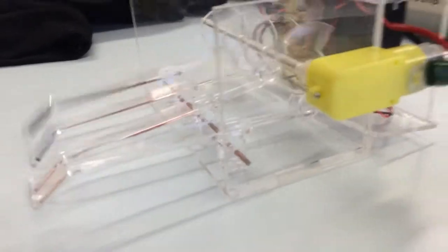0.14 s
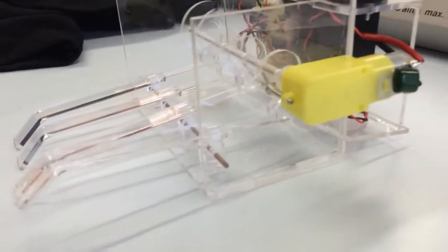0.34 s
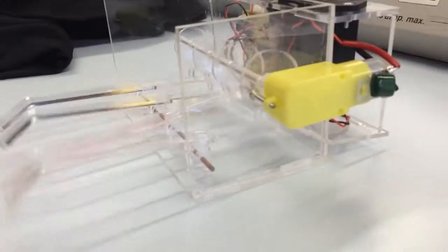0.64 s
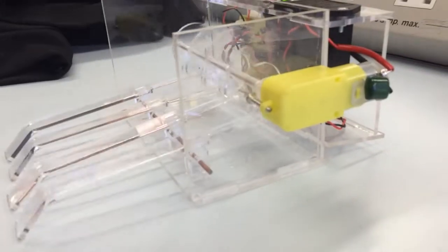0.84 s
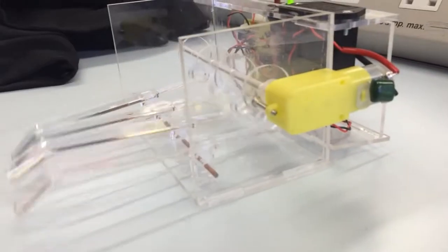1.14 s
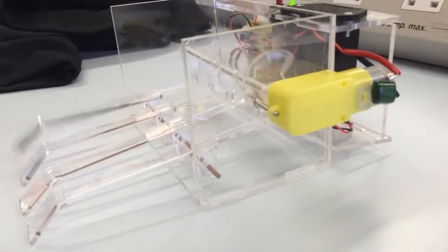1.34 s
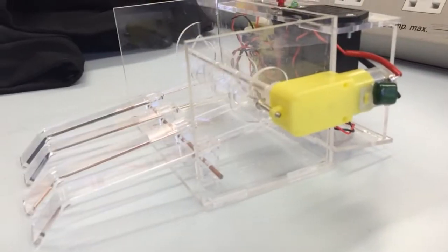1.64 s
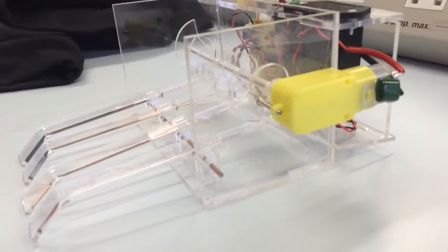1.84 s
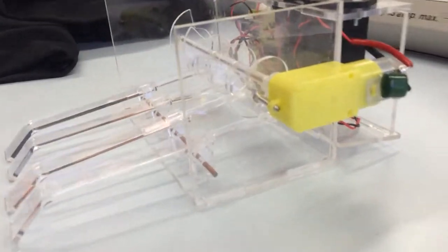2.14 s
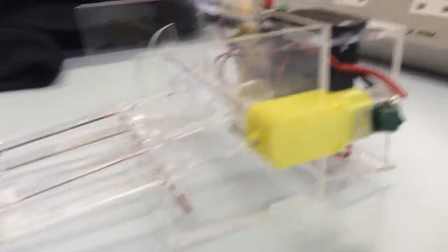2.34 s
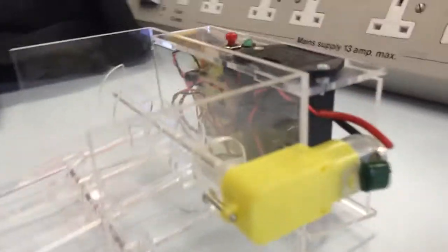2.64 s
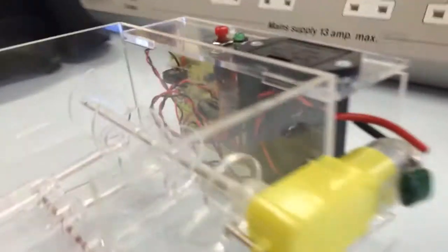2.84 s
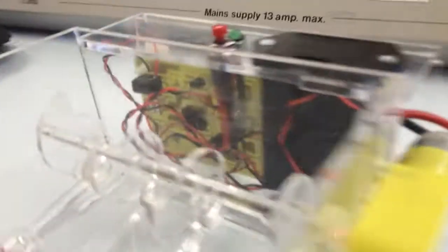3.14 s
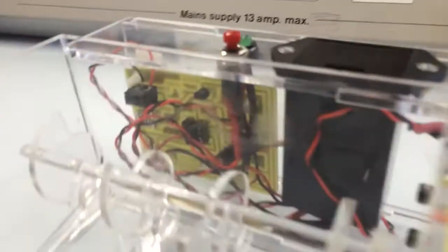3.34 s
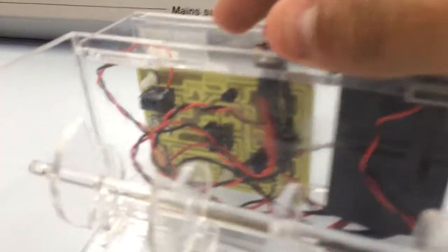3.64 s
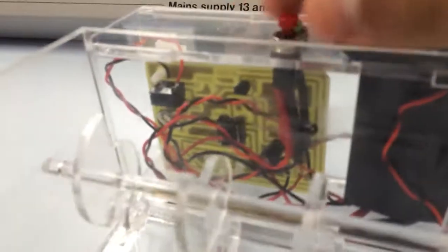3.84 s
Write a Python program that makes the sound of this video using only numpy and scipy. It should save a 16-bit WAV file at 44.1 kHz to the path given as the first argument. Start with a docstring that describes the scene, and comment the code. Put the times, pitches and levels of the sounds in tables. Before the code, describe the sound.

Buzzy little gearmotor with sharp plastic clacking winds down, followed by quiet, knocks and faint touches.

```python
"""On a table in a quiet room, one microphone hears a small geared motor turn a camshaft in a plastic frame:
random tooth clicks, shaft-locked tones and brush hiss, its speed swinging with the cam load. Levers drop off
the cams in three bursts of clacks that ring their modes, over low handling bumps. The motor coasts to rest;
then small ticks, brushes and rattles sound nearby as short bursts of banded noise. Nearby something is knocked
twice: swelling noise that rings furniture modes. Last come faint touches."""
import sys
import numpy as np
from scipy import signal
from scipy.fft import rfft, irfft
from scipy.io import wavfile

SR = 44100
rng = np.random.default_rng(int(sys.argv[2]) if len(sys.argv) > 2 else 0)


def put_to_file(sound):
    """Save the sound as 16-bit audio at rate SR, in the file named by the first command-line argument."""
    columns = np.atleast_2d(sound).T  # one column per channel
    safe = np.clip(columns, -1, 1)
    whole_steps = np.round(safe * 32767)
    wavfile.write(sys.argv[1], SR, whole_steps.astype(np.int16))


def voltage_ratio(decibels):
    """Convert decibels (scalar or array-like) to amplitude ratios, 20 dB per decade."""
    exponent = np.asarray(decibels, float) / 20
    return 10 ** exponent


N = 176400


def rms_one(x):
    """Scale to rms 1."""
    return x / np.sqrt(np.mean(x ** 2) + 1e-20)


def at_hz(points, hz):
    """Read a spectrum table in dB on a log frequency axis."""
    f, db = np.transpose(points)
    return np.interp(np.log(np.maximum(hz, 1)), np.log(f), db)


def colour(x, spectrum, peaks=(), tilt_db=0.):
    """Shape noise by a spectrum, tilted in dB per octave and raised at resonances; rms 1."""
    hz = np.arange(len(x) // 2 + 1) * SR / len(x) + 1
    lift = 1 + sum(voltage_ratio(db) / (1 + (2 * (hz - f) / width) ** 2) for f, width, db in peaks)
    gain = voltage_ratio(at_hz(spectrum, hz) + tilt_db * np.log2(hz / 4000)) * lift
    return rms_one(irfft(rfft(x) * gain, len(x)))


def drift(rate_hz, count):
    """Slow random wander of spread 1: noise through two equal poles, run at SR / 40."""
    r = np.exp(-80 * np.pi * rate_hz / SR)
    noise = rng.standard_normal(count // 40 + 1002)
    slow = signal.lfilter([1], [1, -2 * r, r * r], noise)[1000:]   # settled part
    return np.interp(np.arange(count) / 40, np.arange(len(slow)), rms_one(slow))


def ring(x, hz, t60):
    """A two-pole resonance: a unit click starts a sine of height 1 that falls 60 dB in t60 seconds."""
    r, w = voltage_ratio(-60 / (t60 * SR)), 2 * np.pi * hz / SR
    return signal.lfilter([0, np.sin(w)], [1, -2 * r * np.cos(w), r * r], x + 1e-18)


def bandpass(x, low_hz, high_hz):
    """Keep one band, its top held below 0.45 SR."""
    edges = [low_hz, min(high_hz, .45 * SR)]
    return signal.sosfilt(signal.butter(2, edges, "band", fs=SR, output="sos"), x)


def steep_lowpass(x, order, edge_hz):
    """Cut everything above the edge by 60 dB."""
    return signal.sosfilt(signal.cheby2(order, 60, edge_hz, fs=SR, output="sos"), x)


def add(out, s, x):
    """Mix x in at time s."""
    i = int(s * SR)
    out[i:i + len(x)] += x[:len(out) - i]


def bursts(rows):
    """Grainy noise in a band around a geometric centre: quick rise, slower fall."""
    out, t = np.zeros(N), np.arange(SR // 3) / SR
    for s, db, length, hz, width_hz in rows:
        grain = rng.standard_normal(len(t)) * voltage_ratio(1.6 * rng.exponential(1, len(t)))
        low_hz = np.sqrt(hz ** 2 + width_hz ** 2 / 4) - width_hz / 2
        band = rms_one(bandpass(grain, low_hz, low_hz + width_hz))
        rise = np.minimum(t / (0.097 * length), 1)
        fall = voltage_ratio(-30 * np.maximum(t / length - .6, 0))
        add(out, s, voltage_ratio(db) * band * rise * fall)
    return out


# the quiet room's spectrum: (f/Hz, relative level/dB)
ROOM_SPECTRUM = [(15, -58.5), (25, -24), (53, -7), (75, -16.5), (122, -0.5), (194, -6), (227, -3.5),
                 (290, -13), (332, -10.5), (360, -13.5), (633, -19), (1860, -28.5), (2180, -30),
                 (4520, -37), (15600, -45)]
# fan resonances in it: (f/Hz, width/Hz, lift/dB)
FAN = [(126.7, 13, -4.5), (223.4, 44, 1.5), (332.4, 3.1, 4.5)]


def room():
    """Background noise coloured by the room and raised at fan resonances, its level wandering."""
    level_db = -50 + .7 * drift(6, N)
    return voltage_ratio(level_db) * colour(rng.standard_normal(N), ROOM_SPECTRUM, FAN)


# bumps from handling, mostly low: (t/s, relative level/dB, length/s, centre f/Hz, width/Hz)
BUMPS = [(.185, -32.5, .11, 90.8, 170), (.2, -36.5, 0.15, 48, 23), (.3, -43.5, 0.088, 584, 55),
         (.43, -37.5, 0.084, 312, 39.4), (.86, -40.5, 0.05, 120, 90), (1.42, -46, 0.11, 410, 90),
         (1.56, -46, 0.077, 200, 70), (1.575, -38, 0.021, 1900, 300)]


def bumps():
    """Handling thuds as bursts of banded noise."""
    return bursts(BUMPS)


# small ticks, brushes and rattles nearby: (t/s, relative level/dB, length/s, centre f/Hz, width/Hz)
TOUCHES = [(2.087, -65, 0.017, 1685, 591), (2.1, -54, 0.026, 516, 148), (2.134, -55.5, 0.0038, 6000, 6050),
           (2.136, -59, 0.028, 6040, 499), (2.266, -71, .015, 6150, 600), (2.592, -56, 0.018, 696, 880),
           (2.86, -62.5, 0.082, 4900, 8900), (3.255, -49, 0.084, 756, 120),
           (3.312, -51, 0.0039, 7000, 12100), (3.312, -41.5, 0.052, 1410, 1800),
           (3.376, -37, 0.0036, 5930, 9000), (3.384, -32, 0.0054, 10000, 9100),
           (3.083, -24.5, 0.022, 3320, 700), (3.088, -18, 0.0097, 1614, 350),
           (3.129, -38, 0.016, 3320, 250), (3.1, -31, 0.032, 3540, 300), (3.347, -21.5, 0.0088, 770, 258),
           (3.351, -21.5, 0.0088, 1640, 297), (3.356, -31, 0.015, 3100, 1200),
           (3.573, -66, 0.0038, 7900, 6030), (3.71, -67, 0.047, 10840, 7940),
           (3.728, -59, 0.0065, 6150, 8920), (3.76, -64, 0.006, 12200, 5930),
           (3.885, -72, 0.1, 10000, 9000), (3.925, -54, 0.01, 4000, 8680)]


def touches():
    """Small ticks, brushes and rattles nearby as bursts of banded noise."""
    return bursts(TOUCHES)


# nearby knocks: (t/s, relative level/dB, rise/s, dull above f/Hz, t60/s, extra level/dB of the modes under 400 Hz)
KNOCKS = [(3.045, -18.5, 0.0093, 1870, 0.45, -0.5), (3.061, -36.5, 0.0013, 602, 0.2, -5),
          (3.082, -19.5, 0.0081, 8400, .25, -11), (3.087, -22.5, 0.0045, 4500, 0.14, -0.5),
          (3.345, -17.5, 0.02, 2700, 0.28, -9), (3.356, -22, 0.023, 10000, 0.25, -17),
          (3.482, -48, 0.0099, 5000, 0.19, -1)]
# spectrum of the knock noise: (f/Hz, relative level/dB)
KNOCK_SPECTRUM = [(41, -43), (70, -8), (132, -7), (202, -2), (373, -13), (751, -12), (941, -20.5),
                  (1580, -12.5), (2220, -14), (7690, -14), (15500, -20.5)]
# modes of the knocked furniture: (f/Hz, relative level/dB, t60/s)
PANEL = [(153, -11, .2), (190.5, 1, 0.52), (200, -5, 0.47), (274.2, -3.5, 0.38), (293.7, -3, 0.33),
         (750, -6, 0.043), (814, -11, 0.16), (1200, -6, 0.042), (1570, -4, .06), (1580, -11.5, .05),
         (2380, -5.5, 0.082), (3394, -8, 0.1), (3520, -25, 0.039), (6100, -24, .08)]


def knocks():
    """Each knock swells, dies in the room, treble first, and rings the panel modes."""
    out, t = np.zeros(N), np.arange(SR // 2) / SR
    tail_db, room_t60_s = -34, 0.91
    for s, db, rise, dull_hz, t60, boom_db in KNOCKS:
        grain = voltage_ratio(2.2 * drift(200, len(t)) + 2 * rng.exponential(1, len(t)))
        noise = colour(rng.standard_normal(len(t)), KNOCK_SPECTRUM) * grain
        low = signal.sosfilt(signal.butter(2, 2500, fs=SR, output="sos"), noise)
        high = noise - low
        swell = np.minimum(t / rise, 1) ** 0.55
        tail = noise[::-1] * voltage_ratio(tail_db - 60 * t / room_t60_s)   # reversed to differ from the direct sound
        body = swell * (low * voltage_ratio(-60 * t / t60) + high * voltage_ratio(-85 * t / t60) + tail)
        push = rms_one(rng.standard_normal(len(t))) * swell
        push = push * voltage_ratio(-12 * np.maximum(t / rise - 1, 0)) / np.sqrt(rise * SR)
        for hz, mode_db, mode_t60 in PANEL:
            mode_db = mode_db - 4 + boom_db * (hz < 400) + rng.normal(0, 0.67)
            body = body + voltage_ratio(mode_db) * ring(push, hz, mode_t60)
        add(out, s, voltage_ratio(db) * bandpass(body, 60, dull_hz))
    return out


# level of the motor's brush hiss: (t/s, level/dB)
HISS_LEVEL = [(0, -49), (1.5, -49), (1.58, -47), (1.65, -49), (1.72, -53), (1.8, -60), (1.85, -80)]
# its spectrum: (f/Hz, relative level/dB)
HISS_SPECTRUM = [(4000, -27), (7000, -13.5), (9500, -14.5), (12000, 1.5), (13200, 6.5), (14800, 11),
                 (15600, -11)]


def brushes():
    """Smooth treble noise from the brushes, fading as the motor coasts."""
    s, db = np.transpose(HISS_LEVEL)
    level = voltage_ratio(np.interp(np.arange(N) / SR, s, db, right=-120))
    return colour(rng.standard_normal(N), HISS_SPECTRUM) * level


# shaft at its fastest and slowest as the cams load and release it, before jitter: (t/s, turn rate f/Hz)
SPEED = [(-.1, 208), (.05, 216.2), (.205, 207.6), (.352, 219.3), (.51, 206), (.654, 217.2), (.8, 208.2),
         (.956, 219.7), (1.112, 206.3), (1.265, 216.6), (1.415, 207.6), (1.55, 218)]
# level of grind and tones together: (t/s, relative level/dB)
MOTOR_LEVEL = [(0, -31), (.1, -31.5), (.22, -32), (.33, -33.5), (.45, -34), (.56, -31.5), (.66, -32.5),
               (.78, -32), (.92, -33.5), (1.05, -37.5), (1.17, -34), (1.26, -32), (1.35, -33), (1.45, -32),
               (1.55, -36.5), (1.65, -40), (1.75, -48), (1.811, -63), (1.85, -84)]
# spectrum of the tooth clicks: (f/Hz, relative level/dB)
GRIND_SPECTRUM = [(100, -30), (160, -12), (300, -11), (508, -14), (640, -14), (1070, -7), (1460, -9),
                  (2100, -2), (2540, -5.5), (4000, -5), (5530, -5), (7000, -8), (8600, -13), (10500, -14),
                  (12500, -17), (14000, -21), (15600, -21)]
# resonances of the plastic frame: (f/Hz, width/Hz, lift/dB)
FRAME = [(880, 98, 6.5), (1226, 85, -2), (1326, 96, 7.5), (1946, 170, 2), (3275, 130, -7), (4683, 330, -4),
         (5600, 230, -9.5), (6640, 110, -8), (11900, 400, -1)]
# tones at multiples of the shaft speed, broken ones from the second gear:
# (multiple, nominal level/dB against the grind)
TONES = [(1, -15), (3, -20), (4, -13), (5, -12), (6, -11.5), (8, -17), (9, -13), (10, -11), (11, -11),
         (13, -17), (13.75, -13.5), (15, -17), (16, -10), (16.5, -14), (17, -17), (19.25, -17), (22, -16),
         (25, -16), (26, -17), (32, -21), (33, -16), (47, -22), (48, -16), (49, -22), (51, -24), (54, -22),
         (55, -21), (56, -22), (57, -25), (60, -27), (63, -28), (64, -27), (69, -28), (70, -24),
         (71, -18.5)]


def shaft_speed(t, coasting):
    """Turns per second: eased swings between the load extremes, jitter, and a straight coast down."""
    off_jitter_hz, on_jitter_hz, coast_hz_per_s = 1.1, .3, 520   # the first is added while coasting
    s, hz = np.transpose(SPEED)
    step = np.interp(t, s, np.arange(len(s)))
    step = np.floor(step) + .5 - .5 * np.cos(np.pi * (step % 1))
    jitter_hz = on_jitter_hz + off_jitter_hz * np.minimum(20 * coasting, 1)
    speed = np.interp(step, np.arange(len(s)), hz) + jitter_hz * drift(40, len(t))
    return np.maximum(speed - coast_hz_per_s * coasting, 10)


def gear_grind(turn):
    """Random tooth clicks through the frame, throbbing once a turn; gear backlash makes them stutter."""
    n = len(turn)
    clicks_per_s, spread_db, throb = 7000, 2.8, .3
    heights = voltage_ratio(spread_db * np.minimum(rng.exponential(1, n), 3))
    teeth = (rng.random(n) < clicks_per_s / SR) * heights * rng.choice([-1, 1], n)
    spectrum = rfft(colour(teeth, GRIND_SPECTRUM, FRAME))
    octave = np.clip(np.log2(np.arange(n // 2 + 1) * SR / n + 1), 9, 14)
    grind = np.zeros(n)
    for o in range(9, 15):   # each octave swells on its own as the load shifts
        band = irfft(spectrum * np.maximum(1 - abs(octave - o), 0), n)
        grind += band * voltage_ratio(2.2 * drift(8, n))
    stutter = voltage_ratio(0.61 * drift(1.3, n) + 1.4 * drift(60, n))
    return rms_one(grind) * (1 + throb * np.cos(turn)) * stutter


def shaft_tones(turn, speed, coasting):
    """Sines at multiples of the shaft speed, lifted where they cross the can and end cap resonances."""
    n, out = len(turn), np.zeros(len(turn))
    can_hz, can_width_hz, can_lift = 14900, 2000, 1.3
    cap_hz, cap_width_hz, cap_lift = 11900, 400, 1.2
    comb_db, fade_db_per_s = -17, 75
    mean_hz = np.transpose(SPEED)[1].mean()
    listed = dict(TONES)
    off = np.minimum(20 * coasting, 1)
    can_gain, cap_gain = can_lift * (1 + 5 * off), cap_lift * (1 + 2 * off)   # both ring more while coasting
    fade = voltage_ratio(-fade_db_per_s * coasting)
    for k in sorted({*range(1, 105), *listed}):
        hz = k * speed
        # unlisted multiples follow the grind's colour
        db = listed.get(k, comb_db + at_hz(GRIND_SPECTRUM, min(k * mean_hz, can_hz)))
        can = can_gain / (1 + (2 * (hz - can_hz) / can_width_hz) ** 2)
        cap = cap_gain / (1 + (2 * (hz - cap_hz) / cap_width_hz) ** 2)
        if k < 30:   # low multiples break up as the gears take and drop the load
            waver_db = 4.2 * drift(14, n) - 1
        else:
            waver_db = 3.5 * drift(8, n)
        level = voltage_ratio(db + waver_db) * (fade + can + cap)
        out += level * (hz < .45 * SR) * np.sin(k * turn + rng.uniform(0, 2 * np.pi))
    return out


def motor():
    """Gear grind and shaft tones driven by one turning shaft, which coasts to rest."""
    n, off_s = 2 * SR, 1.52
    t = np.arange(n) / SR
    coasting = np.maximum(t - off_s, 0)   # seconds since switched off
    speed = shaft_speed(t, coasting)
    turn = 2 * np.pi * np.cumsum(speed) / SR
    sound = gear_grind(turn) + shaft_tones(turn, speed, coasting)
    s, db = np.transpose(MOTOR_LEVEL)
    return np.pad(sound * voltage_ratio(np.interp(t, s, db, right=-120)), (0, N - n))


# lever drops: (t/s, relative level/dB, rattle length/s, brightness/dB per octave)
CLACKS = [(0.143, -10.5, 0.0079, 0.3), (0.17, -22.5, 0.0026, -3), (0.2013, -5.5, 0.0018, 0.3),
          (.2510, -8.5, 0.0041, -0.3), (0.7123, -16, 0.0041, 0), (0.7486, -9.5, 0.0046, 1),
          (0.773, -21, 0.0014, -1.3), (0.805, -5, 0.0021, 1), (0.85, -6, 0.0076, 1), (1.2890, -9, 0.005, 1),
          (1.354, -5, 0.0015, 0.6), (1.382, -21.5, 0.0039, -1), (1.41, -10.5, 0.0046, 1.5),
          (1.4606, -7.5, 0.0036, 1.5)]
# spectrum of the crack: (f/Hz, relative level/dB)
CLACK_SPECTRUM = [(240, -37), (400, -11.5), (1770, -6), (2820, 2.5), (4210, -4), (6600, -1), (8720, -4),
                  (10000, 0), (14800, -8), (16200, -26)]
# lever modes, varied at each drop: (nominal f/Hz, relative level/dB, t60/s before shortening by a fifth)
LEVER = [(859, -30.5, 0.033), (1016, 4.5, 0.036), (1840, 2, 0.027), (2340, -10, 0.023), (2970, -3.5, 0.015),
         (4080, -5.5, 0.014), (4600, -12.5, .012), (7180, -9.5, 0.014), (8070, 5, 0.0067), (10000, -8, .01),
         (12840, -1.5, .01)]


def levers():
    """Each drop rattles for a few ms as a dense crack and rings the lever modes."""
    out, t = np.zeros(N), np.arange(4096) / SR
    for s, db, length, tilt_db in CLACKS:
        onset = np.minimum(t / .0002, 1)
        decay_db = -3 * t / length - 60 * np.maximum(t - length, 0) / .012
        crack = colour(rng.standard_normal(len(t)), CLACK_SPECTRUM, tilt_db=tilt_db) * onset * voltage_ratio(decay_db)
        rings = np.zeros(len(t))
        for hz, mode_db, t60 in LEVER:
            mode = ring(crack, hz * rng.uniform(.94, 1.06), .8 * t60)
            rings += voltage_ratio(mode_db + rng.normal(0, 2)) * mode
        add(out, s, voltage_ratio(db - 5.5) * (crack + voltage_ratio(-31.5) * rings))
    return out


def scene():
    """One microphone hears it all; only the sharp clacks reach above the treble edge."""
    soft = room() + bumps() + touches() + knocks() + brushes() + motor()
    mono = levers() + steep_lowpass(soft, 20, 15550)
    return np.array([mono, mono])


def roll_off(x):
    """The treble ends steeply here."""
    return signal.sosfilt(signal.butter(12, 16640, fs=SR, output="sos"), x)


def record(dry):
    """Peaks are rounded and the top is cut steeply."""
    rounded = 0.65 * np.tanh(dry / 0.75)
    mix = steep_lowpass(rounded, 16, 16800)
    return roll_off(mix)


dry = scene()
out = record(dry)
put_to_file(out)
```